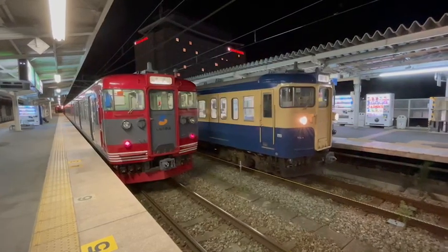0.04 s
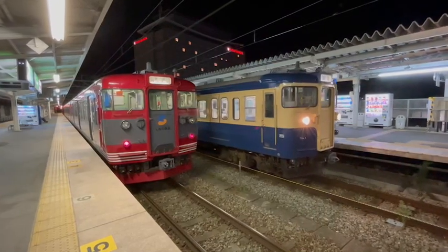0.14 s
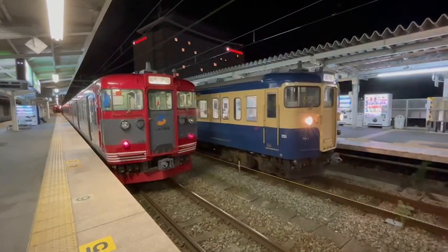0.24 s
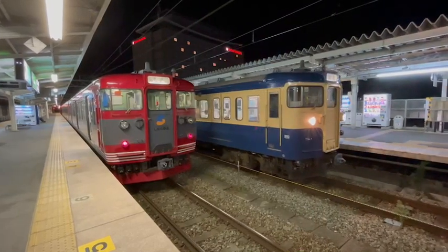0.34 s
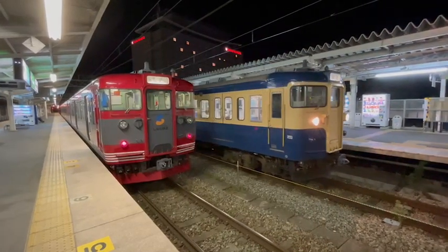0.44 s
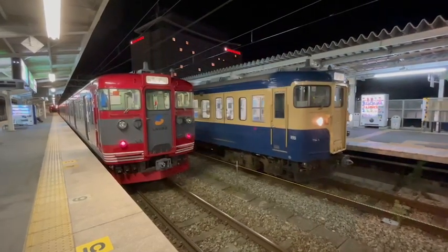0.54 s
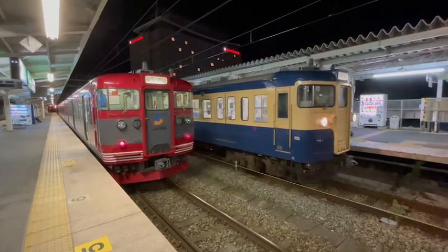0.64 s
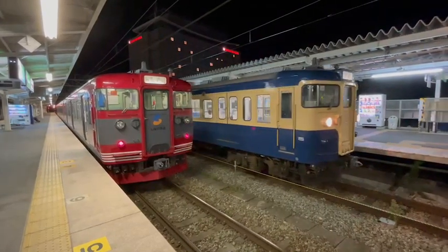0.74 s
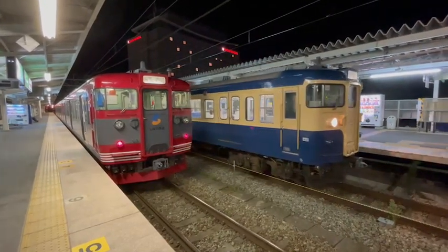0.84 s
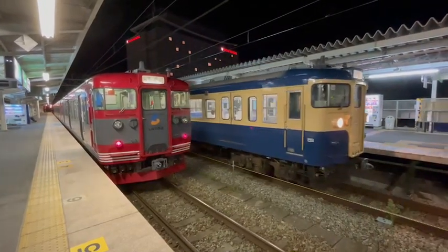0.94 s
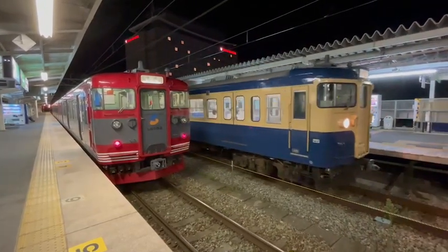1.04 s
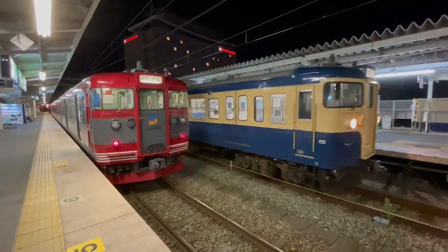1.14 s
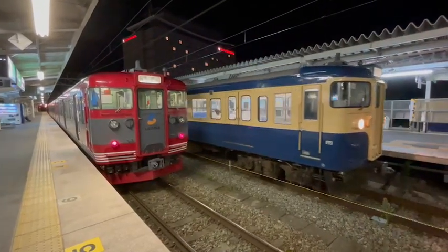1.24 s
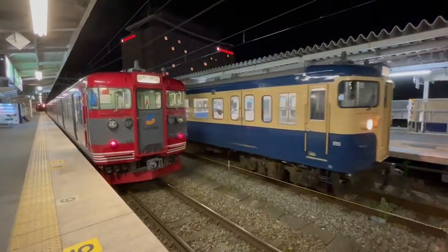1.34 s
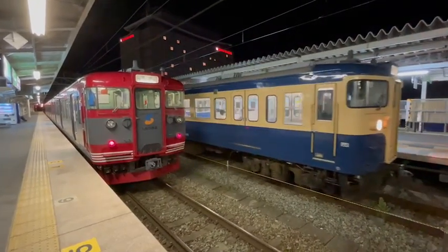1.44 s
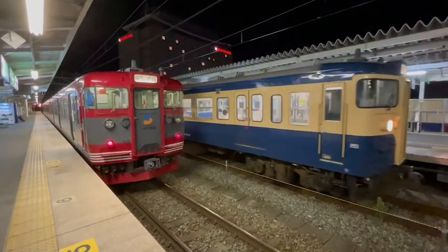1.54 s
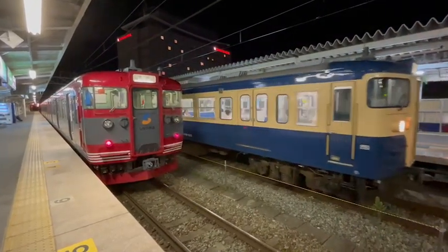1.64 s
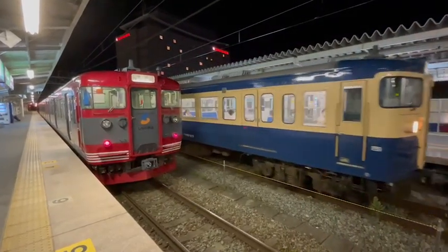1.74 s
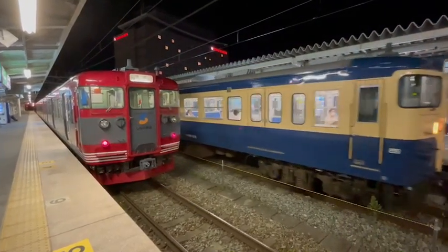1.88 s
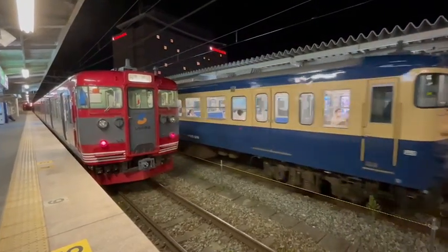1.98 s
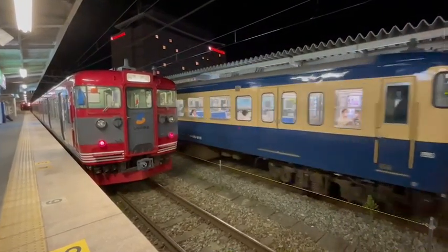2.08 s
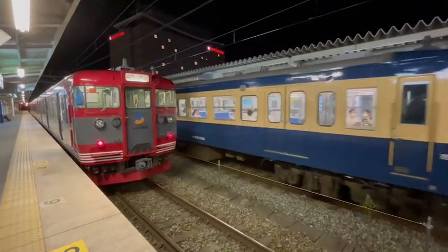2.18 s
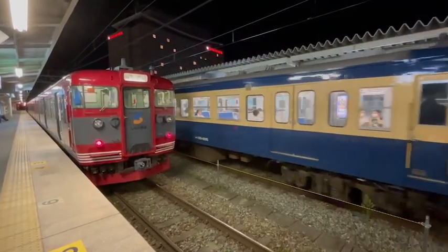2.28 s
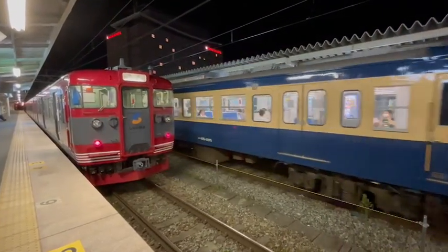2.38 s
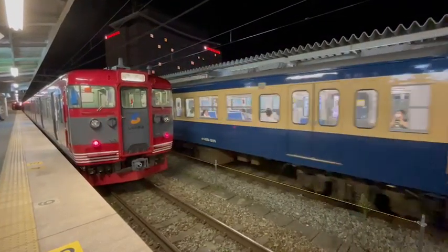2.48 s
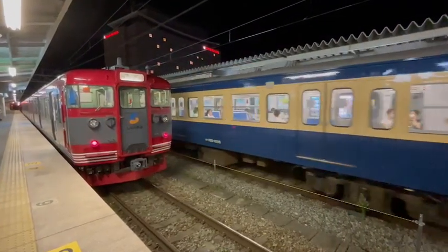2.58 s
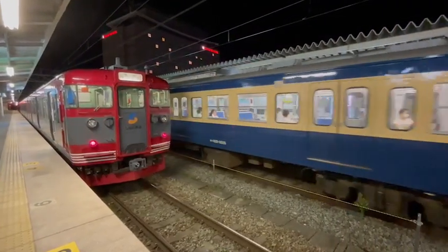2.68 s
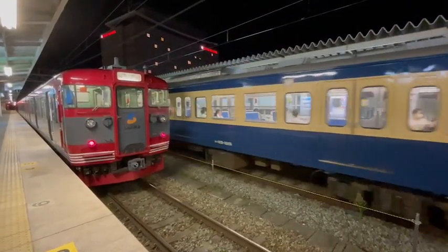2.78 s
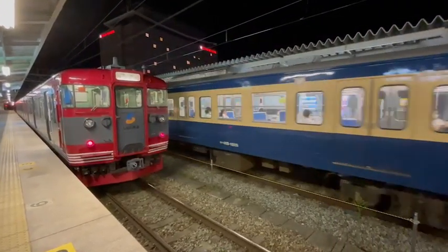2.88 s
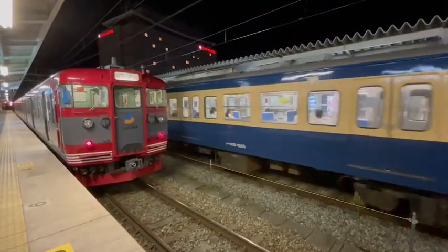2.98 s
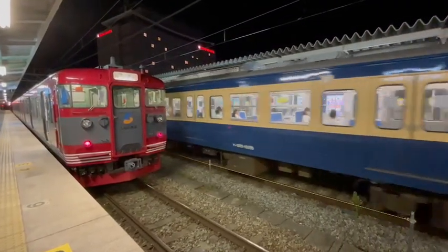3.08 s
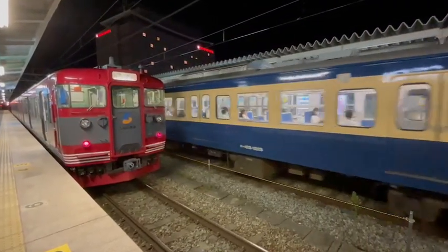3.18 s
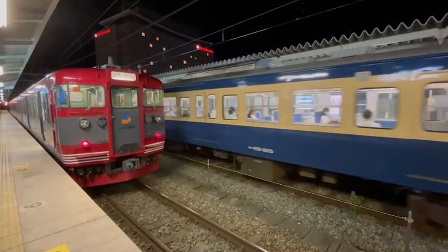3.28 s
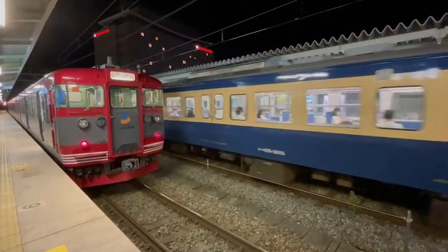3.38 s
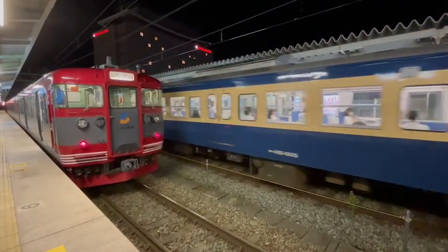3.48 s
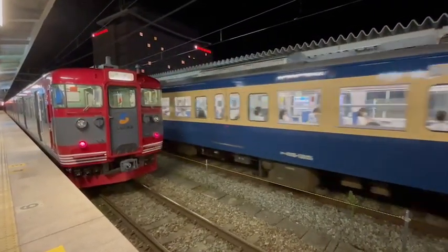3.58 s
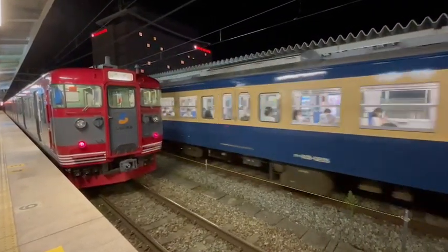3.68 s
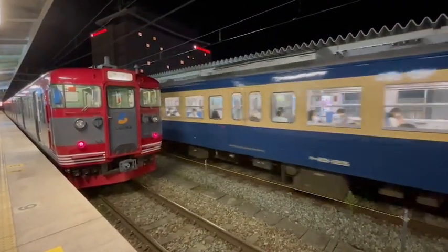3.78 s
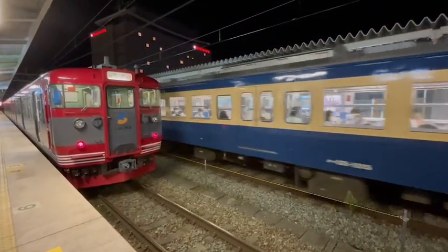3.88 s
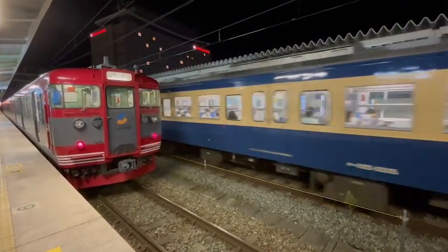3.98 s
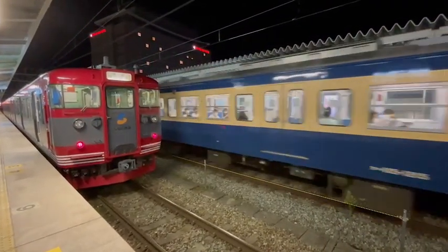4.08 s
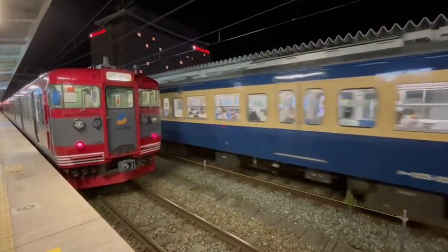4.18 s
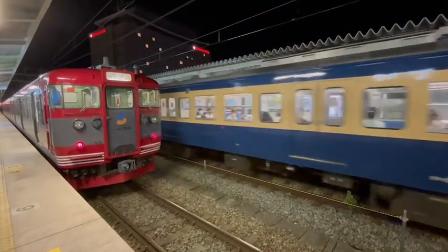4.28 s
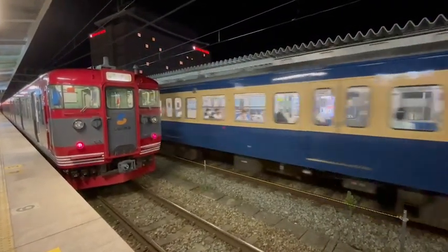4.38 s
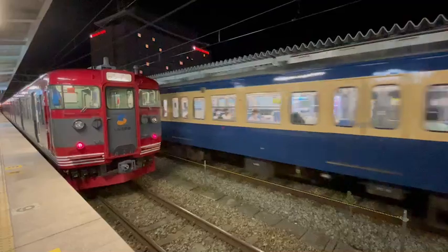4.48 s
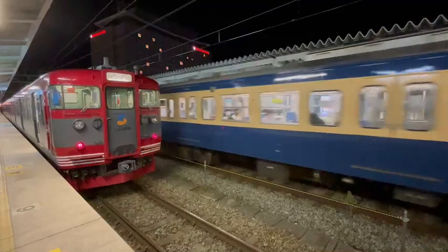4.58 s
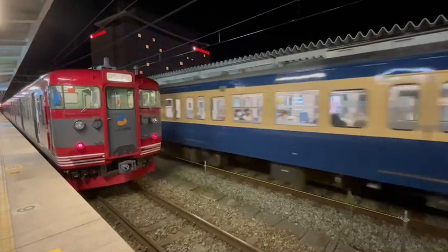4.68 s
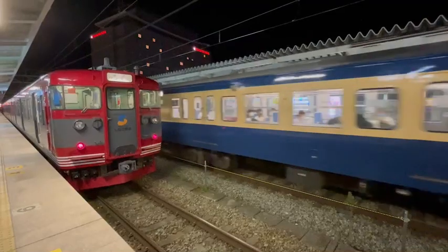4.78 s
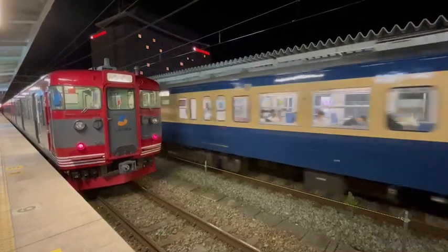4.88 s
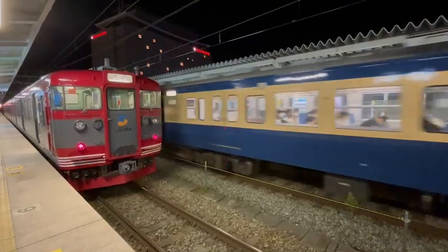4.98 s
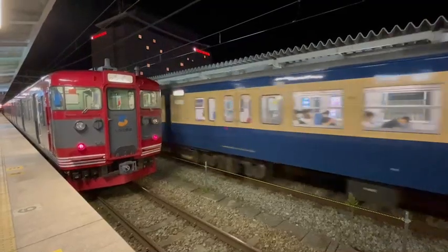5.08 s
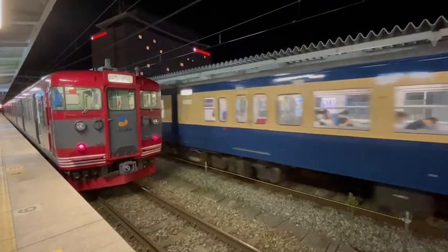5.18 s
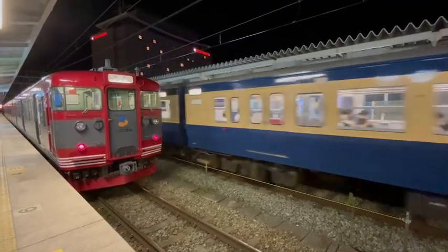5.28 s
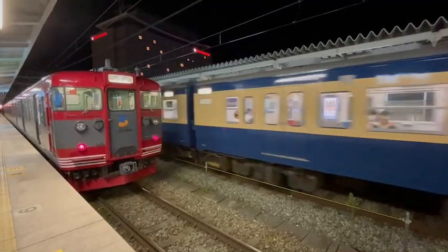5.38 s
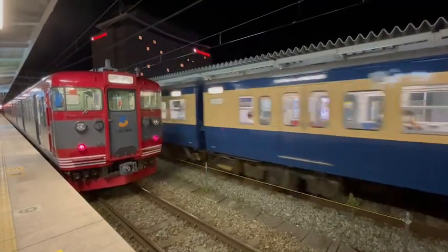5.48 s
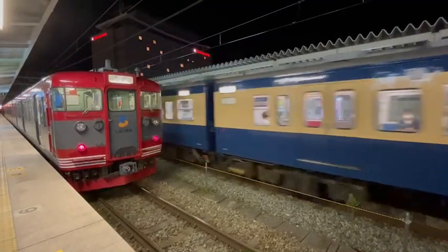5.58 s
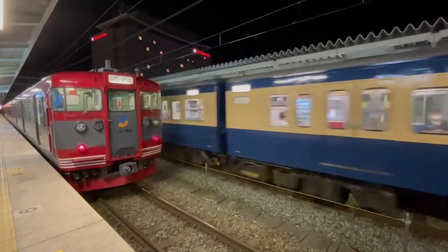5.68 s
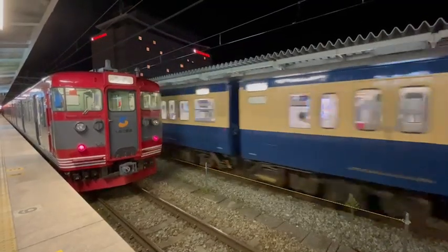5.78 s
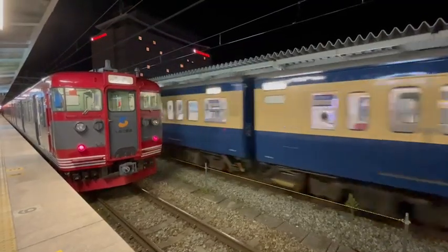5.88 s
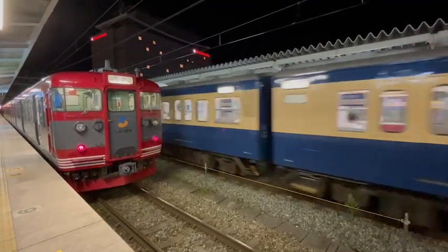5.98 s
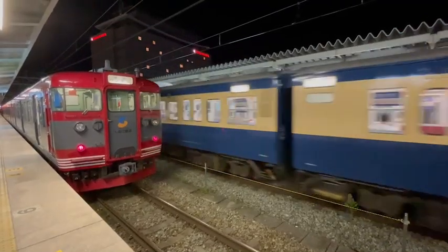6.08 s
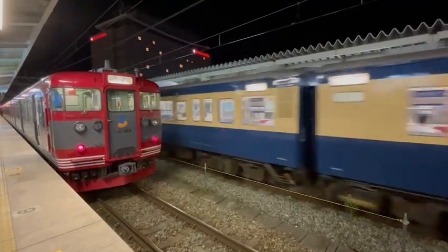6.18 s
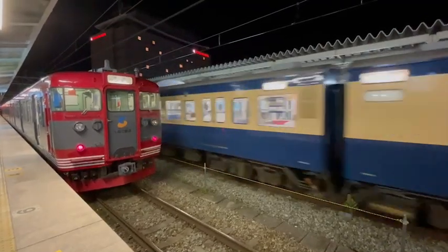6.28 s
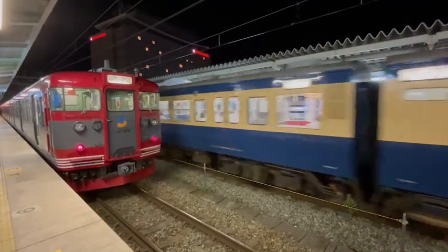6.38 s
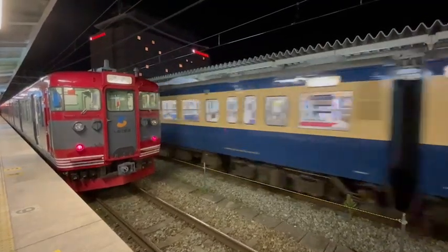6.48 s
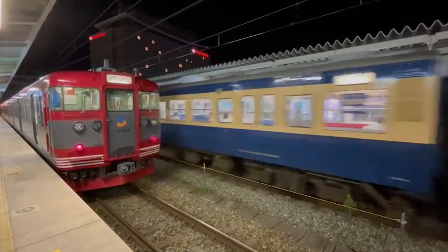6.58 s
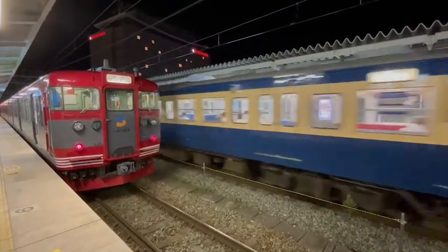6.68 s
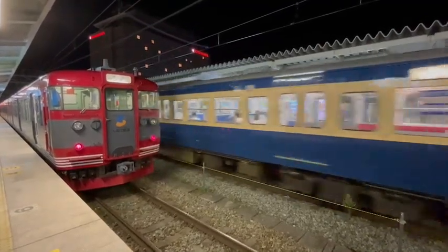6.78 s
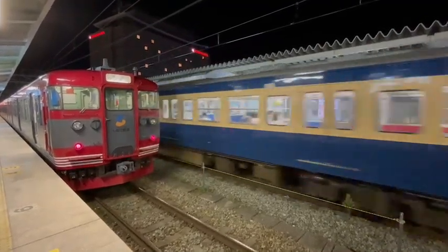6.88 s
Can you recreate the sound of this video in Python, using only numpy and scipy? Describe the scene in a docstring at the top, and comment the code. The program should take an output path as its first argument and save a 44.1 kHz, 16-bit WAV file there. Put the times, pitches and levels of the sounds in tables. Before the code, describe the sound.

Wheels squeal as an electric train departs, followed by a climbing motor whine, rail joint clanks and a growing rumble.

```python
"""An electric train pulls out of a station, two tracks away from a stereo microphone.
Stick-slip friction makes its flanges squeal as it starts. Rough wheels and rails excite a growing
rolling noise, and gear whine and fan tones climb in pitch with speed. Axles strike a rail joint,
setting rail modes ringing and bogies rattling, while the track bed thuds under the load.
The cooling blowers of a standing train drone underneath."""
import sys
import numpy as np
from scipy import signal
from scipy.fft import rfft, irfft
from scipy.io import wavfile
from scipy.ndimage import uniform_filter1d

SR = 44100
rng = np.random.default_rng(int(sys.argv[2]) if len(sys.argv) > 2 else 0)


def waveform_to_disk(signal):
    """Save audio, clipped to [-1, 1], as 16-bit WAV at the path in sys.argv[1]."""
    frames = np.transpose(np.atleast_2d(signal))
    scaled = np.clip(frames, -1, 1) * 32767
    samples = np.round(scaled).astype(np.int16)
    wavfile.write(sys.argv[1], SR, samples)


N = 306054
T = np.arange(N) / SR

# Strength of the rolling excitation as bogies draw level: time_s, rolling_db, rumble_db
ROLLING_LEVELS = [(0.0, 2, -53), (0.7, -2, -55), (1.3, -1.5, -44), (1.8, -5, -37), (2.4, -3, -42),
                  (2.9, -1.5, -34.5), (3.6, 1.5, -35.5), (4.3, 1.5, -38.5), (4.7, 3, -37.5),
                  (5.2, 6.5, -30.5), (5.8, 9.5, -32.5), (6.3, 12, -31.5), (6.94, 11, -33.5)]
# Relative spectra of the rolling noise, lowest band first: frequency_hz, density_db
RUMBLE_SPECTRUM = [(13, -51), (33, -44), (48, -10), (65, -0.5), (97, -3.5), (140, -7), (180, -74),
                   (310, -120)]
BOOM_SPECTRUM = [(71, 2), (120, -2.5), (215, 0), (277, -1), (370, 1), (453, -5), (540, -21.5), (700, -19),
                 (1190, -120)]
ROAR_SPECTRUM = [(280, -27), (480, 1), (591, -1.5), (698, -1), (800, -1), (960, -3), (1080, -5.5),
                 (1350, -12.5), (1900, -20.5), (2470, -18.5), (4180, -120)]
HISS_SPECTRUM = [(1000, -3.5), (1700, -1), (2400, -4.5), (2680, -2.5), (3600, -7), (4040, -6), (5060, -4.5),
                 (6300, -17.5), (8190, -31), (13900, -120)]
FIZZ_SPECTRUM = [(3410, -41), (5800, -11), (6360, 0), (6710, 2), (9740, -5), (10600, -9.5), (12200, -15.5),
                 (13600, -22)]
# Broad resonance of the rail under the nearest bogie: time_s, pitch_hz, level_db
RAIL_RESONANCE = [(2.9, 890, -56), (4.5, 901, -52), (5.2, 921, -44.5), (5.7, 950.5, -38.5),
                  (6.1, 945.5, -37.5), (6.4, 899, -39), (6.94, 950, -40)]
# Blower tones of the standing train: pitch_hz, width_hz, level_db
BLOWER_TONES = [(274.7, 25, -43.5), (349.2, 33, -47.5), (412.7, 28, -52.5)]
# Relative spectrum of its low drone: frequency_hz, density_db
DRONE_SPECTRUM = [(13, -43), (22, -7), (36, -9), (54, 11), (68, -12), (92, -30), (130, -4), (170, -55),
                  (290, -120)]
# Flange grips on the rail edge: start_s, length_s, pitch_hz, squeal_db, overtones_db, scrape_db
FLANGE_GRIPS = [(0.01, 0.045, 3290, -84, -80, -54.5), (0.187, 0.07, 3360, -48.5, -54, -53),
                (0.312, 0.11, 3290, -51.5, -57, -60), (0.396, 0.094, 3390, -58, -60, -50.5),
                (0.52, 0.038, 3400, -72, -49, -66), (0.565, 0.047, 3318, -53, -45, -54),
                (0.634, 0.09, 3363, -53, -55, -51.5), (0.735, 0.12, 3390, -56, -52.5, -47.5),
                (0.916, 0.054, 3300, -61, -63, -50.5), (1.017, 0.06, 3390, -48, -48, -46.5),
                (1.086, 0.081, 3380, -46.5, -54, -50.5), (1.186, 0.2, 3394, -56, -57, -55),
                (1.406, 0.15, 3260, -59, -65, -53), (1.603, 0.12, 3320, -58, -61, -58),
                (1.735, 0.15, 3310, -55.5, -62.5, -58), (1.9, 0.22, 3310, -77, -85, -61)]
# Harmonics of the squeal: pitch_ratio, width_hz, gain_db
SQUEAL_OVERTONES = [(2, 160, 0), (3, 280, -10.5)]
# Relative spectrum of the flange scrape: frequency_hz, density_db
SCRAPE_SPECTRUM = [(1500, -28), (2500, 7), (3500, 1), (4400, 11), (5300, 1), (7000, -4), (10000, -1),
                   (12000, -11), (13600, -20)]
# Short wheel squeaks and flares of the squeal's upper harmonics:
# start_s, length_s, start_hz, end_hz, width_hz, level_db
SQUEAKS_AND_FLARES = [(0.19, 0.09, 9900, 9950, 220, -63), (0.3, 0.16, 9840, 9950, 180, -59),
                      (0.517, 0.1, 13230, 13400, 400, -68), (0.728, 0.14, 10050, 10000, 250, -60),
                      (0.598, 0.1, 11300, 11200, 200, -67), (1.03, 0.08, 13300, 13400, 400, -70),
                      (0.296, 0.14, 4270, 4270, 99.7, -56), (0.473, 0.035, 1204, 1180, 120, -44),
                      (0.482, 0.04, 1460, 1480, 120, -46), (0.592, 0.062, 4470, 4590, 300, -45.5),
                      (0.608, 0.27, 9060, 9050, 170, -56.5), (0.631, 0.25, 3450, 3530, 130, -53.5),
                      (0.761, 0.05, 3120, 3110, 160, -47.5), (0.872, 0.084, 3750, 3720, 98, -53),
                      (0.934, 0.071, 4250, 4290, 80, -47), (1.006, 0.03, 3740, 3670, 90.4, -39.5),
                      (1.042, 0.12, 8080, 7980, 111, -57), (1.043, 0.32, 4680, 4700, 260, -57),
                      (1.202, 0.11, 3600, 3680, 119.6, -53), (1.286, 0.11, 3480, 3430, 91, -54),
                      (1.402, 0.065, 3210, 3250, 90, -55), (1.889, 0.089, 3820, 3900, 90, -47.5),
                      (1.996, 0.083, 7460, 9700, 500, -69), (2.092, 0.057, 9800, 9750, 250, -61.5),
                      (2.234, 0.18, 9600, 9700, 250, -70)]
# Modes of the wheel discs: pitch_hz, width_hz, gain_db
DISC_MODES = [(1970, 130, -4), (2595, 75, 1.5), (2770, 70, -10), (3300, 120, -4.5), (3850, 110, -9),
              (4110, 85, -4), (4620, 60, -12), (5050, 220, -7), (5790, 160, -10)]
# Strength of their ringing: time_s, level_db
DISC_LEVELS = [(1.2, -61.5), (3.9, -57), (4.4, -53), (6.94, -50)]
# Sleepers and ballast loaded by axles near and far: start_s, level_db, pitch_hz, t60_s
BED_THUDS = [(2.099, -30, 74, 0.44), (2.429, -34, 59.7, 1), (2.759, -24.5, 88.6, 0.21),
             (3.018, -21.5, 62, 0.52), (3.075, -24.5, 75.4, 0.31), (3.139, -29, 66.5, .28),
             (3.372, -30, 90.3, 0.4), (3.43, -22.5, 68, 0.24), (3.606, -22, 71, .3),
             (3.644, -19, 72.4, 0.43), (3.974, -20.5, 74, 0.17), (4.058, -30, 59.7, 0.27),
             (4.54, -20.5, 84.5, 0.12), (4.568, -19, 87, 0.29), (4.598, -19, 92.5, 0.14),
             (4.649, -22.5, 67, 0.2), (4.985, -20.5, 93.4, 0.35), (5.014, -15.5, 95.7, 0.22),
             (5.195, -24, 101, .3), (5.585, -19, 65.6, 0.56), (5.774, -22, 88.5, 0.36),
             (5.936, -25, 113.4, 0.36), (5.968, -22, 72, 0.44), (6.401, -24, 64.8, .3),
             (6.698, -25, 108.4, 0.39)]
# Gear whine swelling as motors pass: time_s, level_db
GEAR_LEVELS = [(2.9, -50), (3.2, -36.5), (3.4, -45), (3.52, -34.5), (3.66, -28), (3.78, -42), (3.9, -42),
               (4.05, -44), (4.14, -32), (4.24, -41), (4.35, -33.5), (4.46, -44), (4.6, -35), (4.76, -35.5),
               (4.95, -47), (5.3, -44), (5.55, -36.5), (5.78, -44), (5.96, -27.5), (6.08, -37.5),
               (6.2, -45), (6.32, -45), (6.45, -38), (6.55, -37), (6.76, -37), (6.94, -36.5)]
# Shift of the whine about the tooth rate as motors pass: time_s, shift_hz
GEAR_SHIFTS = [(3.7, 0), (3.8, -8), (4.0, -0.5), (4.6, 3), (4.85, -5), (5.3, 7), (6.0, 8), (6.4, -1),
               (6.94, -1.5)]
# Strength of the motor fans: time_s, level_db
FAN_LEVELS = [(2.9, -68), (4.2, -57), (4.55, -37.5), (4.9, -52), (5.2, -38), (5.45, -53), (5.75, -34),
              (5.87, -28.5), (6.0, -40.5), (6.15, -32), (6.42, -29.5), (6.5, -35.5), (6.6, -27.5),
              (6.76, -27), (6.83, -34.5), (6.94, -30.5)]
# Fan blade tones: tooth_rate_ratio, width_hz, gain_db, steady_ratio
FAN_TONES = [(.816, 12, 1.5, 1.57), (.41, 6.2, -6.5, 1.7)]
# Axle blows on the joint: start_s, clang_db, ring_hz, other_ring_hz, tick_db, rattle_db,
# rattle_length_s, jingle_db, jingle_rise_s
AXLE_BLOWS = [(3.026, -30.5, 840, 980, -45, -31.5, 0.045, -48, 0.049),
              (3.608, -42, 856, 1000, -56, -32.5, 0.037, -51, 0.035),
              (4.541, -33, 1130, 776, -38.5, -29, 0.051, -66, .02),
              (4.987, -39.5, 780, 875, -36, -32, 0.042, -48, .02),
              (5.553, -28.5, 630, 1010, -55.5, -28, 0.056, -56, .04),
              (5.928, -32.5, 610, 1090, -58, -26.5, 0.05, -61, 0.033)]
# Relative spectra of contact tick, bogie rattle and loose parts: frequency_hz, density_db
TICK_SPECTRUM = [(600, -20), (1500, 0), (4000, 4), (9000, -4), (13600, -16)]
RATTLE_SPECTRUM = [(88, -37), (150, -8.5), (264, -4.5), (371, -2), (606, -14), (851, -8.5), (1310, -22),
                   (2790, -26), (9700, -40.5), (13600, -55)]
JINGLE_SPECTRUM = [(2500, -30), (4500, -7), (5400, 6), (6300, -12), (7500, -2), (9600, -7), (11000, -13),
                   (13600, -28)]
# Modes of the rail end: pitch_hz, gain_db, t60_s
RAIL_MODES = [(617, 2.5, 0.086), (790, -19, .1), (846, 2, 0.25), (855, 1, 0.088), (956, -5, 0.033),
              (1021, 3, 0.027), (1108, -2, 0.1), (1455, 5, 0.11), (2690, -1.5, .1)]
# Brief gliding hums and ringing resonances as bogies pass:
# start_s, length_s, start_hz, end_hz, width_hz, level_db
HUMS_AND_RINGS = [(5.8, 0.56, 370, 417, 8, -35), (5.49, 0.48, 340, 360, 14, -36.5),
                  (6.05, 0.26, 360, 336, 9.8, -33.5), (4.9, 2.1, 190, 250, 18, -46.5),
                  (5.93, 0.1005, 810, 950, 37, -39), (5.5, 0.1, 1010, 1200, 40, -36),
                  (6.076, 0.068, 900, 895, 40, -44), (6.3, 0.31, 890, 795, 16, -45),
                  (6.62, 0.13, 1005, 900, 20, -39), (6.755, 0.27, 1030, 1040, 11, -39),
                  (6.75, 0.14, 454, 428, 12, -36.5)]
# Likeness of the noise at the two capsules: frequency_hz, correlation
STEREO_COHERENCE = [(60, 0.99), (180, 0.88), (520, 0.15), (1500, 0.16), (4500, 0.022), (13200, 0.097)]
# Level difference between the capsules: frequency_hz, left_minus_right_db
STEREO_BALANCE = [(60, 1), (180, 1), (520, 2.5), (1520, 1), (4480, 0), (6000, 6), (9000, -5.5),
                  (13200, -0.5)]


def amp(db):
    """Amplitude ratio of a level in decibels."""
    return 10 ** (np.asarray(db) / 20)


def unit_rms(x):
    return x / np.sqrt(np.mean(x ** 2) + 1e-20)


def at_frequency(points, hz):
    """Interpolation of a table on a logarithmic frequency axis."""
    frequency_hz, value = np.transpose(points)
    return np.interp(np.log(hz + 1), np.log(frequency_hz + 1), value)


def curves(rows):
    """Each column after time_s, interpolated over the whole scene."""
    time_s, *columns = np.transpose(rows)
    return [np.interp(T, time_s, column) for column in columns]


def flutter(rate_hz, depth_db):
    """Random modulation: a factor that wanders about one."""
    steps = rng.standard_normal(200)
    return amp(depth_db * np.interp(T * rate_hz, np.arange(200), steps))


def burst(start_s, rise_s, hold_s, t60_s):
    """Envelope of a damped vibration: a quick rise, then exponential decay from hold_s after onset."""
    age = T - start_s
    return np.clip(age / rise_s, 0, 1) ** 2 * amp(-60 * np.maximum(age - hold_s, 0) / t60_s)


def noise(spectrum, patchy_db):
    """Partly coherent stereo noise of a given colour, its level mottled over time and frequency."""
    frames, hz = N // 256 + 5, np.fft.rfftfreq(1024, 1 / SR)
    a, b, c, d, patches = rng.standard_normal((frames, 513, 5)).T
    patches = unit_rms(uniform_filter1d(uniform_filter1d(patches, size=10, axis=0), size=12, axis=1))
    coherence = at_frequency(STEREO_COHERENCE, hz)[:, None]
    left = a + 1j * b
    right = coherence * left + np.sqrt(1 - coherence ** 2) * (c + 1j * d)
    mottled = np.array([left, right]) * amp(patchy_db * patches)
    white = signal.istft(mottled, nperseg=1024, noverlap=768)[1][:, :N]
    colour = amp(at_frequency(spectrum, np.fft.rfftfreq(N, 1 / SR)))
    return unit_rms(irfft(rfft(white) * colour, N))


def narrowband(hz, width_hz, spread):
    """A carrier modulated by low-pass noise; spread runs from 0 (mono) to 1 (independent channels)."""
    pole = np.exp(-np.pi * width_hz / SR)
    real, imag = signal.lfilter([1], [1, -2 * pole, pole * pole], rng.standard_normal((2, 2, N)))
    mid, side = real + 1j * imag
    drift = np.array([mid + spread * side, mid - spread * side])
    carrier = np.exp(2j * np.pi * np.cumsum(hz * np.ones(N)) / SR)
    return unit_rms((drift * carrier).real)


def tone(hz, width_hz, steady):
    """A sinusoid of relative amplitude `steady` within a narrow band of noise."""
    sine = np.sin(2 * np.pi * np.cumsum(hz) / SR)
    return unit_rms(narrowband(hz, width_hz, spread=0.37) + steady * sine)


def rolling_noise():
    """Forced vibration: wheel and rail roughness shakes the track bed and the body over a wide band."""
    rolling_db, rumble_db = curves(ROLLING_LEVELS)
    rumble = amp(rumble_db) * noise(RUMBLE_SPECTRUM, patchy_db=-1.5)
    boom = amp(-34.5 + 0.65 * rolling_db) * noise(BOOM_SPECTRUM, patchy_db=1.5)
    roar = amp(-42.5 + 0.6 * rolling_db) * noise(ROAR_SPECTRUM, patchy_db=1.2)
    hiss = amp(-48 + 0.94 * rolling_db) * noise(HISS_SPECTRUM, patchy_db=2.5)
    fizz = amp(-61 + 1.1 * rolling_db) * noise(FIZZ_SPECTRUM, patchy_db=2.0)
    return rumble + boom + roar + hiss + fizz


def rail_song():
    """Resonance: the rail under the nearest bogie responds in one broad band."""
    hz, db = curves(RAIL_RESONANCE)
    return amp(db) * flutter(6.6, 1.9) * narrowband(hz, width_hz=280, spread=0.98)


def standing_train():
    """Rotation at constant speed: cooling blowers hold their pitch above a low drone."""
    blowers = sum(amp(db) * flutter(4, 2.5) * narrowband(hz, width_hz, spread=0.37)
                  for hz, width_hz, db in BLOWER_TONES)
    return blowers + amp(-47) * noise(DRONE_SPECTRUM, patchy_db=-0.5)


def flange_squeal():
    """Stick-slip friction on the rail edge: a wavering squeal, its overtones, scrape and squeaks."""
    starts_s, lengths_s, pitches_hz, *levels_db = np.transpose(FLANGE_GRIPS)
    hz = np.interp(T, starts_s + lengths_s / 2, pitches_hz)
    hz *= flutter(21.9, 0.11)  # the pitch wavers by about 1 %
    grips = np.array([burst(start_s, 0.015, length_s, t60_s=0.22)
                      for start_s, length_s in zip(starts_s, lengths_s)])
    squeal_gain, overtone_gain, scrape_gain = amp(levels_db) @ grips
    overtones = sum(amp(db) * flutter(34.25, 2.8) * narrowband(ratio * hz, width_hz, spread=1.0)
                    for ratio, width_hz, db in SQUEAL_OVERTONES)
    out = squeal_gain * flutter(42.04, 4.0) * narrowband(hz, width_hz=116, spread=0.92)
    out += overtone_gain * overtones + scrape_gain * noise(SCRAPE_SPECTRUM, patchy_db=2.0)
    for start_s, length_s, start_hz, end_hz, width_hz, db in SQUEAKS_AND_FLARES:
        glide_hz = np.interp(T, [start_s, start_s + length_s], [start_hz, end_hz])
        envelope = amp(db) * burst(start_s, 0.014, length_s, t60_s=0.28) * flutter(44.65, 2)
        out += envelope * narrowband(glide_hz, width_hz, spread=0.99)
    return out


def wheel_discs():
    """Normal modes: the discs ring at pitches independent of speed, harder after each joint blow."""
    modes = sum(amp(db) * flutter(24, 2.5) * narrowband(hz, width_hz, spread=1.0)
                for hz, width_hz, db in DISC_MODES)
    fade_in = np.clip((T - DISC_LEVELS[0][0]) / 0.21, 0, 1)  # the first bogie draws level
    kick_db = 3.5 * sum(burst(start_s, 0.035, 0.021, t60_s=0.91) for start_s, *_ in AXLE_BLOWS)
    return fade_in * amp(curves(DISC_LEVELS)[0] + kick_db) * modes


def sleeper_thuds():
    """Damped oscillation: sleepers and ballast thud under an axle; a stiffer mode adds a knock."""
    out = np.zeros(N)
    for start_s, db, hz, t60_s in BED_THUDS:
        phase = 2 * np.pi * hz * (T - start_s)
        thud = burst(start_s, 0.0065, 0.016, t60_s) * np.sin(phase)
        knock = amp(-13.5) * burst(start_s, 0.017, 0.004, t60_s=0.14) * np.sin(2.316 * phase)
        out += amp(db) * (thud + knock)
    return out


def traction_motors():
    """Periodic forcing: gear teeth and fan blades sound at frequencies proportional to shaft speed."""
    pull_s, climb_hz_per_s, sag_hz_per_s2 = 2.9, 66, 1.1
    age = T - pull_s
    tooth_hz = 258.9 + climb_hz_per_s * age - sag_hz_per_s2 * age ** 2
    whine = tone(tooth_hz + curves(GEAR_SHIFTS)[0], width_hz=17.4, steady=1.5)
    gears = amp(curves(GEAR_LEVELS)[0]) * whine * flutter(18, 1.1)
    blades = sum(amp(db) * flutter(6.7, 0.68) * tone(ratio * tooth_hz, width_hz, steady)
                 for ratio, width_hz, db, steady in FAN_TONES)
    fans = amp(curves(FAN_LEVELS)[0]) * blades
    return np.clip(age / 0.056, 0, 1) * (gears + fans)


def joint_impacts():
    """Impact excitation: a wheel ticks on the rail end, its bogie rattles and loose parts jingle."""
    tick, rattle, jingle = np.zeros((3, N))
    for start_s, *_, tick_db, rattle_db, rattle_s, jingle_db, rise_s in AXLE_BLOWS:
        tick += amp(tick_db) * burst(start_s, 0.00043, 0.0021, t60_s=0.061)
        rattle += amp(rattle_db) * burst(start_s, 0.011, rattle_s, t60_s=0.59)
        jingle += amp(jingle_db) * burst(start_s, rise_s, rise_s + 0.034, t60_s=0.48)
    return (tick * noise(TICK_SPECTRUM, patchy_db=0)
            + rattle * noise(RATTLE_SPECTRUM, patchy_db=1)
            + jingle * noise(JINGLE_SPECTRUM, patchy_db=-1))


def rail_clang():
    """Free vibration: the struck rail end rings most in modes near the two pitches a blow favours."""
    out = np.zeros((2, N))
    for blow_s, clang_db, ring_hz, other_ring_hz, *_ in AXLE_BLOWS:
        start_s = blow_s + 0.006  # the rail answers after the tick
        span = slice(round(start_s * SR), round((start_s + 0.5) * SR))
        age = T[span] - start_s
        for hz, db, t60_s in RAIL_MODES:
            octaves_off = min(abs(np.log2(hz / ring_hz)), abs(np.log2(hz / other_ring_hz)))
            level_db = clang_db + db + max(-100 * octaves_off, -17)
            decay_db = -60 * np.maximum(age - 0.025, 0) / t60_s
            envelope = np.clip(age / 0.0012, 0, 1) * amp(level_db + decay_db)
            throb_hz = 55 * rng.uniform(0.6, 1.41)  # loose fishplates modulate each mode
            envelope *= 1 + 0.4 * np.sin(2 * np.pi * (throb_hz * age + rng.random()))
            turns = hz * rng.uniform(1.0, 1.01) * age
            channel_turns = 0.38 * rng.random((2, 1))
            out[:, span] += envelope * np.sin(2 * np.pi * (turns + channel_turns))
    return out


def passing_bogies():
    """Narrow-band vibration: brief gliding hums and ringing resonances sound as bogies pass."""
    out = np.zeros((2, N))
    for start_s, length_s, start_hz, end_hz, width_hz, db in HUMS_AND_RINGS:
        glide_hz = np.interp(T, [start_s, start_s + length_s], [start_hz, end_hz])
        envelope = amp(db) * burst(start_s, 0.053, length_s, t60_s=0.43)
        out += envelope * tone(glide_hz, width_hz, steady=0.63)
    return out


def scene():
    """Superposition: the pressures of all sources add."""
    return (rolling_noise() + rail_song() + standing_train() + flange_squeal() + wheel_discs()
            + sleeper_thuds() + traction_motors() + passing_bogies() + joint_impacts() + rail_clang())


def record(dry):
    """Linear filtering: two band-limited capsules differ slightly in colour and in treble delay."""
    bass_cut_hz, treble_cut_hz = 44, 13750
    right_lag_s, lag_from_hz = 0.000347, 495
    hz = np.fft.rfftfreq(N, 1 / SR)
    lean_db = at_frequency(STEREO_BALANCE, hz) / 2
    delay = np.exp(-2j * np.pi * right_lag_s * np.maximum(hz - lag_from_hz, 0))
    capsules = np.array([amp(lean_db), amp(-lean_db) * delay])
    high_pass = 1 / np.sqrt(1 + (bass_cut_hz / (hz + 1)) ** 6)
    coloured = irfft(rfft(dry) * capsules * high_pass, N)
    low_pass = signal.firwin(511, treble_cut_hz, window=("kaiser", 9), fs=SR)
    return signal.oaconvolve(coloured, low_pass[None], "same")


dry = scene()
out = record(dry)
waveform_to_disk(out)
```